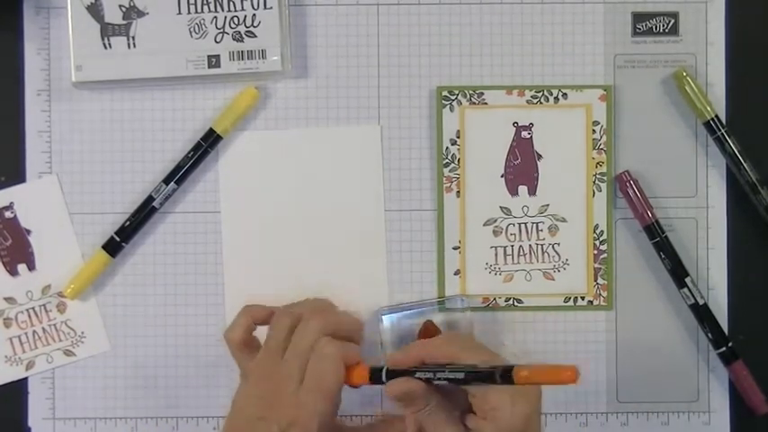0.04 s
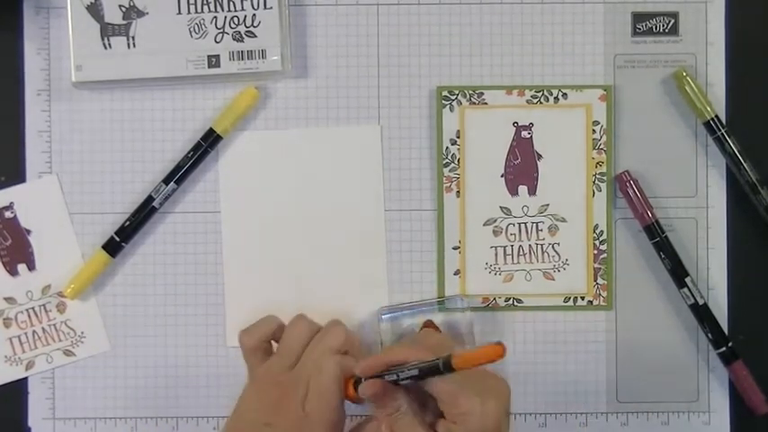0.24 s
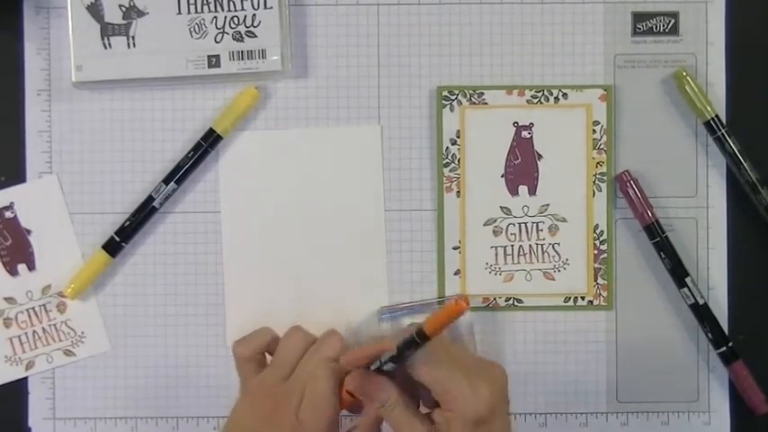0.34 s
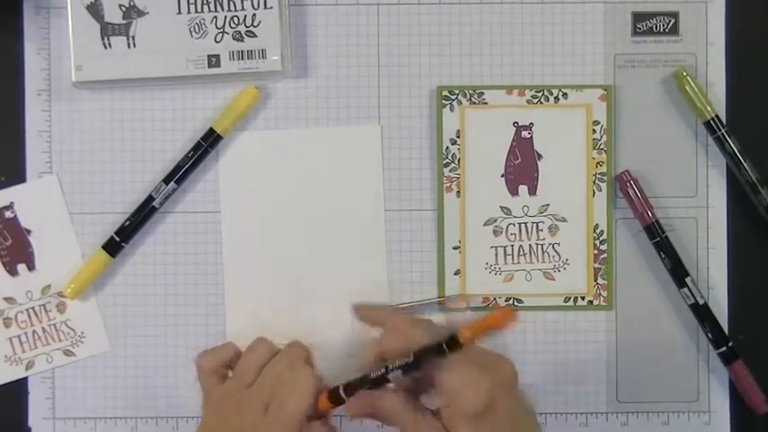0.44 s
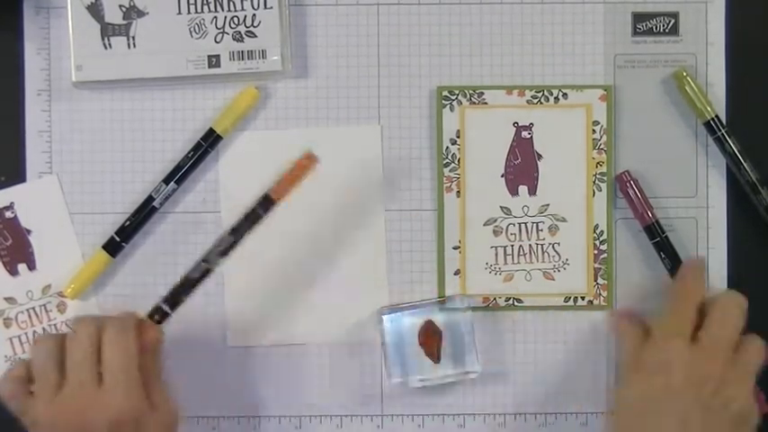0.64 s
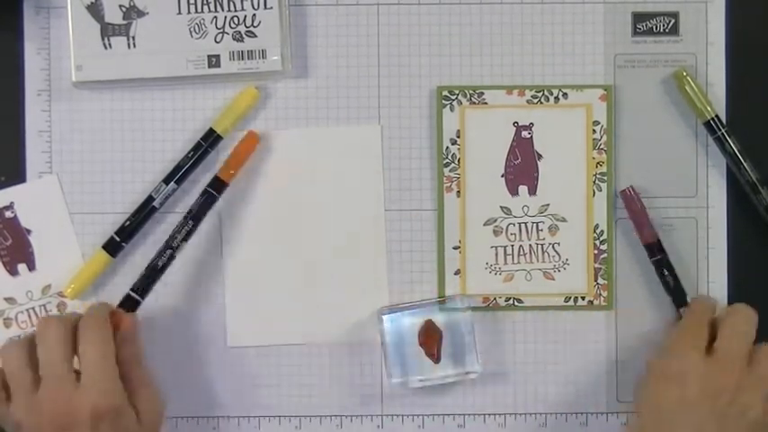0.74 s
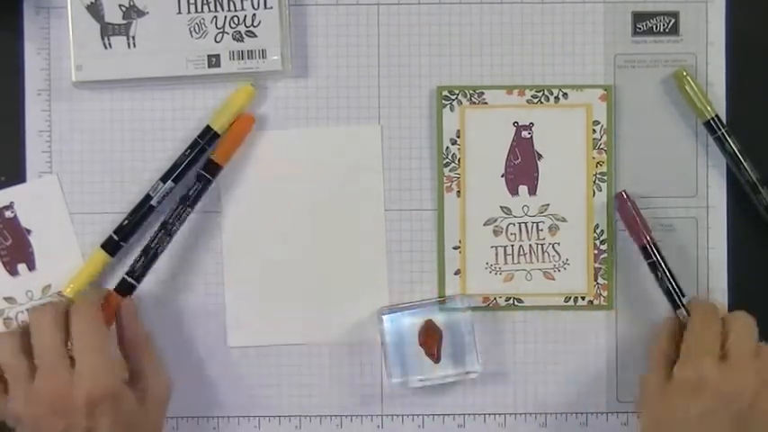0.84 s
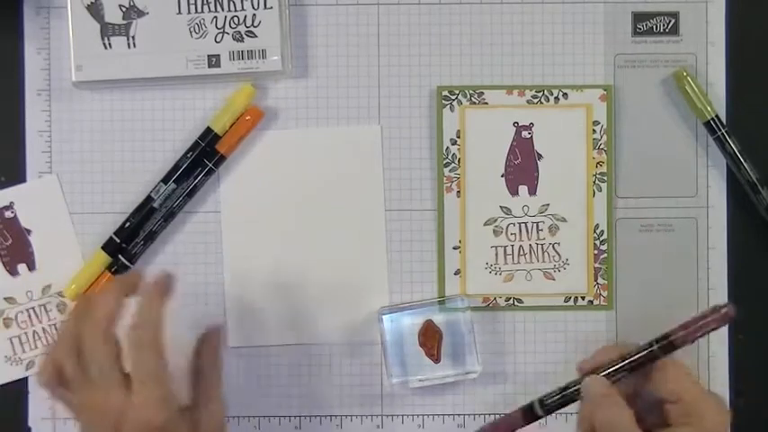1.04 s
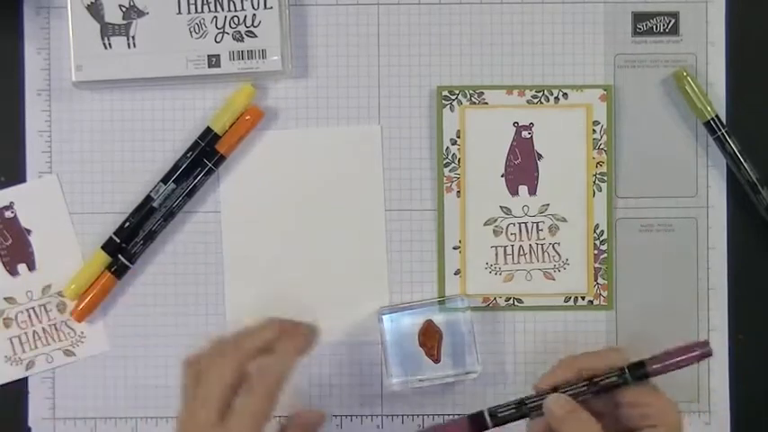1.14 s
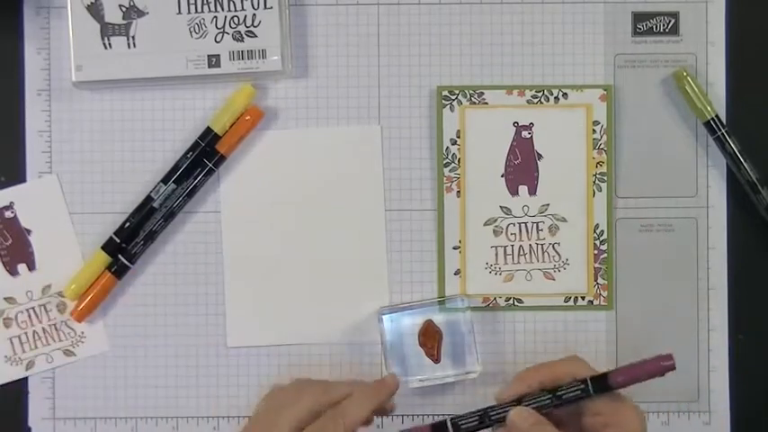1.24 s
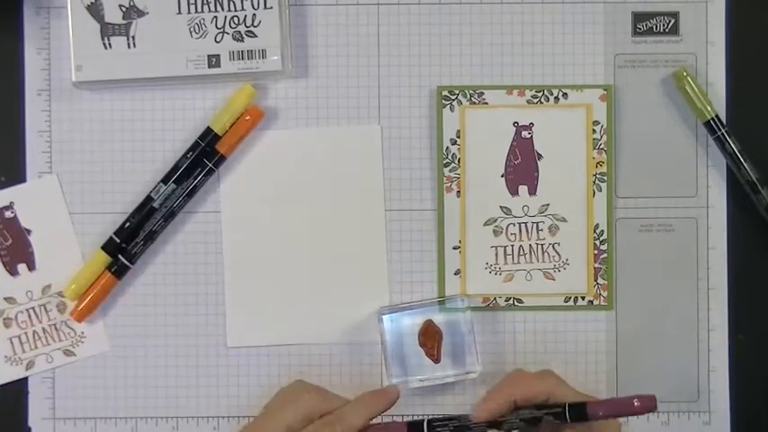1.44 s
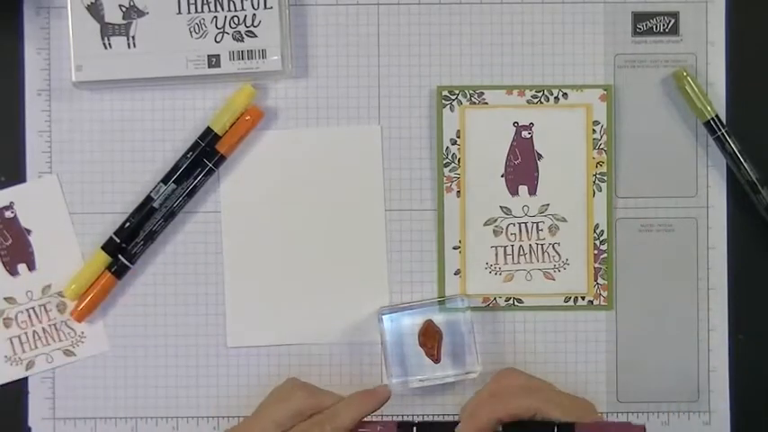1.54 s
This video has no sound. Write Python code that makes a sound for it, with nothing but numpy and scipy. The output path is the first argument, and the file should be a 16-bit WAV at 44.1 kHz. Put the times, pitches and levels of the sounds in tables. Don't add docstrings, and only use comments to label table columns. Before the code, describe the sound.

Plastic felt markers on a wooden table, heard close from above. Tiny cap creaks from 0.03 s lead to a sharp snap at 0.21 s. One hollow pen knocks down at 0.76 s, rocks softly at 0.89 s, and another lands at 0.99 s. Light ticks follow until 1.26 s. Faint motor pulses run until 0.7 s; a distant clock ticks near 0.4 and 1.4 s over soft room hiss.

```python
import sys
import numpy as np
from scipy import signal
from scipy.io import wavfile

SR = 44100
rng = np.random.default_rng(int(sys.argv[2]) if len(sys.argv) > 2 else 0)


def convert_level_to_amplitude(level_db):
    exponent = np.asarray(level_db, float) / 20
    return 10 ** exponent


def store_pcm(level_fs):
    pcm = np.round(np.clip(level_fs, -1, 1) * 32767).astype(np.int16)
    wavfile.write(sys.argv[1], SR, np.atleast_2d(pcm).T)


N = 70560


def butter(x, order, hz, kind="low"):
    return signal.sosfilt(signal.butter(order, hz, kind, fs=SR, output="sos"), x)


def ring(clicks, hz, t60_s):
    r = convert_level_to_amplitude(-60 / (max(t60_s, 1e-3) * SR))
    w = 2 * np.pi * hz / SR
    return signal.lfilter([1, -r * np.cos(w)], [1, -2 * r * np.cos(w), r * r], clicks)


def strike(contacts, modes, scatter_db, order=2):
    length, body_floor_hz = 4410, 352
    out = np.zeros(N + length)
    spread_db = scatter_db * rng.standard_normal((len(contacts), len(modes)))
    for (start_s, peak_db, cutoff_hz), offsets_db in zip(contacts, spread_db):
        touch = butter(np.arange(length) == 0, order, min(cutoff_hz, 19000))
        touch = touch / touch.max()
        start = int(start_s * SR)
        for (hz, mode_db, t60_s), offset_db in zip(modes, offsets_db):
            level = convert_level_to_amplitude(peak_db + mode_db + offset_db)
            out[start:start + length] += level * ring(touch, hz, t60_s)
    return butter(out[:N], 2, body_floor_hz, "high")


def pan(x, db):
    return x * convert_level_to_amplitude(np.array([[db / 2], [-db / 2]]))


# start_s, peak_db, cutoff_hz
CAP_SNAP = [
    (.2123, -27, 11800),
    (.2126, -10, 12300),
    (.2133, -34, 5200),
]
CAP_CREAKS = [
    (.0346, -38.5, 4030),
    (.0387, -37, 5400),
    (.0414, -37, 6000),
    (.0420, -61, 5100),
    (.0568, -33.5, 7000),
    (.0625, -43, 7000),
    (.0800, -35.5, 9100),
    (.1010, -55, 13100),
    (.1019, -38, 13000),
]
# mode_hz, level_db, t60_s
CAP_MODES = [(1150, -27, 0.034), (1535, -17, 0.012), (2570, -7, 0.0067), (3100, -8.5, 0.009),
             (3860, -14.5, 0.0055), (4700, -13, 0.0089), (5500, -9.5, 0.00057), (8340, -1.5, 0.002),
             (9600, -5.5, 0.002), (11100, -12.5, 0.0032)]
LOOSE_CAP_MODES = [(1430, -12.5, 0.0095), (1860, -11.5, 0.0088), (2500, -23, .012), (3027, -20, 0.045),
                   (3140, -22.5, 0.086), (3420, -21.5, 0.068), (5660, -17.5, 0.0056), (7100, -13, 0.0037),
                   (10000, -15.5, 0.0041)]


def cap():
    snap = strike(CAP_SNAP, CAP_MODES, scatter_db=7.5)
    treble = butter(snap, 2, 6000, "high")
    creaks = strike(CAP_CREAKS, LOOSE_CAP_MODES, scatter_db=3.5)
    return pan(snap - treble, 1.1) + pan(treble, 2.5) + creaks


# start_s, peak_db, cutoff_hz
FIRST_DROP = [
    (.7634, -25.5, 4800),
]
ROCK_BACK = [
    (.8893, -38.5, 6300),
]
SECOND_DROP = [
    (.9862, -23, 5500),
    (.9866, -26.5, 5500),
    (0.9955, -37, 2500),
]
# mode_hz, level_db, t60_s
FIRST_PEN_MODES = [(482, -15, 0.045), (736, -15.5, 0.017), (1150, -21.5, 0.037), (1770, -3, 0.0064),
                   (2240, -14.5, 0.011), (3300, -19.5, 0.017), (4400, -17, 0.0087), (5840, -7.5, 0.0043),
                   (7000, -11, 0.0058)]
SECOND_PEN_MODES = [(436, -14, 0.0086), (895, -17.5, 0.02), (1124, -6.5, 0.018), (2000, -12.5, 0.013),
                    (2660, -10, 0.0079), (3460, -9, 0.0075), (4950, -37, 0.0037), (5730, -8, 0.0031),
                    (7500, -22, .003)]


def pens():
    first = strike(FIRST_DROP, FIRST_PEN_MODES, scatter_db=0.5)
    back = strike(ROCK_BACK, FIRST_PEN_MODES, scatter_db=2.5, order=4)
    second = strike(SECOND_DROP, SECOND_PEN_MODES, scatter_db=1.5)
    return first - back + second


# start_s, peak_db, place_0to1, swell_s
TABLE_BLOWS = [
    (0.7645, -21, 0.0, 0.0018),
    (0.215, -49, 0.4, 0.0049),
    (.5100, -58.5, 0, 0.0025),
    (.7220, -49.5, 0, 0.0025),
    (0.741, -59, 0.2, .004),
    (.9100, -47, 0.8, 0.0086),
    (0.9862, -20, 1.0, 0.0008),
]
# mode_hz, t60_s
TABLE_MODES = [(100, 0.031), (130, 0.2), (200, 0.19), (228, 0.18), (262, 0.092), (275, 0.21), (300, 0.095),
               (322, 0.23), (345, 0.1), (415, 0.23), (440, 0.18), (518, 0.13)]
LEFT_END_DB = [-12.5, -27.5, -24, -11.5, -6, -0.5, -27, -20, -15.5, -13.5, -22, -22.5]
RIGHT_END_DB = [-32, -13.5, -15.5, -11.5, -10.5, -2, -18, -3, -13.5, -11, -18.5, -12.5]
FIRST_SWING = [-1, -1, -1, -1, 1, -1, -1, 1, -1, -1, 1, 1]


def table_top():
    u = np.arange(SR // 2) / SR
    out = np.zeros(N + SR)
    for start_s, peak_db, place, swell_s in TABLE_BLOWS:
        start = int(start_s * SR)
        swell = 1 - np.exp(-u / swell_s)
        for (hz, t60_s), left_db, right_db, way in zip(TABLE_MODES, LEFT_END_DB, RIGHT_END_DB, FIRST_SWING):
            mode_db = left_db + place * (right_db - left_db)
            decay = convert_level_to_amplitude(peak_db + mode_db - 60 * u / t60_s)
            out[start:start + len(u)] += way * decay * swell * np.sin(2 * np.pi * hz * u)
    return butter(out[:N], 2, 72, "high")


TICK_TIMES_S = [.1008, .7183, .7625, .8612, .8757, .9030, .9200, .9857, 1.0227, 1.0685, 1.2538, 1.2540,
                1.2552, 1.2568, 1.2590]
# level_db, pitch_hz, width_hz, length_s
TICK_SOUNDS = [(-32.5, 6300, 3900, 0.001), (-45, 6300, 2300, 0.0018), (-35.5, 5100, 7200, 0.00072),
               (-44, 5800, 8000, 0.0014), (-39, 2800, 7000, 0.0015), (-53, 3100, 4300, .011),
               (-57, 2800, 2500, .0041), (-26.5, 6600, 6200, 0.00095), (-39, 6800, 2500, 0.0018),
               (-39, 4600, 2500, 0.0011), (-47.5, 7900, 3800, 0.0012), (-39, 3820, 1600, 0.0024),
               (-43, 3760, 700, 0.0024), (-41, 2260, 450, 0.003), (-45, 2000, 640, 0.00605)]


def ticks():
    u = np.arange(2205) / SR
    out = np.zeros(N + len(u))
    noises = rng.standard_normal((len(TICK_SOUNDS), len(u)))
    for start_s, (level_db, pitch_hz, width_hz, length_s), noise in zip(TICK_TIMES_S, TICK_SOUNDS, noises):
        low_hz = pitch_hz - min(width_hz, pitch_hz) / 2
        high_hz = min(pitch_hz + width_hz / 2, 19000)
        burst = butter(noise * np.exp(-u / length_s), 2, [low_hz, high_hz], "band")
        start = int(start_s * SR)
        out[start:start + len(u)] += convert_level_to_amplitude(level_db) * burst / np.abs(burst).max()
    return out[:N]


# tone_hz, level_db, length_s
MOTOR_TONES = [(893, -55, 0.009), (2838, -59.5, 0.0093)]
MOTOR_LAG_S = [-.0025, .001]
SINGING_STEPS = [4, 10, 11, 13, 15, 16, 18, 20]


def focus_motor():
    steps_per_s, from_s, to_s = 30.0, 0.0135, 0.70
    first_step_db, scatter_db, quiet_step_db = 5.5, 1.4, -14
    times_s = np.arange(from_s, to_s, 1 / steps_per_s)
    offset_db = scatter_db * rng.standard_normal((len(times_s), 2))
    offset_db[0, 0] += first_step_db
    offset_db[:, 1] += quiet_step_db * ~np.isin(np.arange(len(times_s)), SINGING_STEPS)
    t, out = np.arange(N) / SR, 0
    for k, ((hz, tone_db, length_s), lag_s) in enumerate(zip(MOTOR_TONES, MOTOR_LAG_S)):
        for start_s, level_db in zip(times_s, tone_db + offset_db[:, k]):
            u = t - start_s - lag_s
            swell = np.sin(np.pi * np.clip(u / length_s, 0, 1))
            out = out + convert_level_to_amplitude(level_db) * swell * np.sin(2 * np.pi * hz * u)
    return out


CLOCK_FIRST_S, CLOCK_PERIOD_S = 0.382, 1.0
# mode_hz, level_db, t60_s
CLOCK_MODES = [(423, -56, 0.029), (550, -55.5, 0.14), (743, -56.5, 0.015), (1640, -55, 0.0048),
               (3050, -64, 0.0052), (6500, -63.5, 0.004)]
CLOCK_LAG_S = [.012, .012, .012, 0, 0, 0]


def clock():
    attack_s, spread_s = 0.01, 0.042
    out, noise = 0, rng.standard_normal((2, N))
    for k, ((hz, level_db, t60_s), lag_s) in enumerate(zip(CLOCK_MODES, CLOCK_LAG_S)):
        u = (np.arange(N) / SR - CLOCK_FIRST_S - lag_s) % CLOCK_PERIOD_S
        envelope = np.minimum(u / attack_s, 1) * np.exp(-u / spread_s)
        tone = ring(ring(noise[k % 2], hz, t60_s), hz, t60_s / 3)
        tone = tone / np.sqrt(np.mean(tone ** 2) + 1e-20)
        out = out + convert_level_to_amplitude(level_db) * tone * envelope
    return out


def train(rows):
    out = np.full(N, 1e-18)
    for row in rows:
        out[int(row[0] * SR)] += convert_level_to_amplitude(row[1])
    return out


KNOCK_LAG_S = [.0145, .041]


def clock_knock():
    hz, level_db, t60_s, back_db = 543, -45, 0.077, -2
    rows = []
    for n in range(2):
        for k, lag_s in enumerate(KNOCK_LAG_S):
            rows.append((CLOCK_FIRST_S + n * CLOCK_PERIOD_S + lag_s, level_db + k * back_db))
    soft = butter(train(rows), 2, [hz / 2, hz * 2], "band")
    return ring(soft, hz, t60_s)


def at_hz(points, hz):
    table_hz, values = np.transpose(points)
    return np.interp(np.log(hz), np.log(table_hz), values)


def bands(spectrum, likeness, size):
    edges_hz = 20 * 2 ** np.arange(0, 9.9, 1 / 3)
    settle = 4000
    white, out = rng.standard_normal((2, 2, size + settle)), []
    for k, (low_hz, high_hz) in enumerate(zip(edges_hz, edges_hz[1:])):
        mid, side = butter(white[k % 2], 2, [low_hz, high_hz], "band")[:, settle:]
        hz = np.sqrt(low_hz * high_hz)
        alike = np.clip(at_hz(likeness, hz), 0, 1)
        stereo = np.sqrt(1 + alike) * mid + np.sqrt(1 - alike) * side * [[1], [-1]]
        out.append((hz, convert_level_to_amplitude(at_hz(spectrum, hz)) * stereo))
    total = np.sqrt(np.mean(sum(band for _, band in out) ** 2))
    return [(hz, band / total) for hz, band in out]


# hz, t60_s
ROOM_T60 = [(200, 0.38), (1000, 0.28), (3000, 0.28), (8000, 0.23), (15000, 0.28)]
# hz, left_right_likeness
ECHO_LIKENESS = [(200, 0.97), (1500, 0.99), (6000, 1), (15000, 1)]
# lag_s, gain_db over the diffuse answer
WALLS = [(0.0118, 4.5), (0.023, 3), (.029, -1.5), (.038, -0.5), (.0245, -1.5), (.033, 3.5)]


def echo(rows, colour, level_db):
    first_wall_s, build_s, wall_width_s, desk_share = 0.0062, 0.0024, 0.002, 0.68
    t = np.arange(SR // 2) / SR
    build = 1 - np.exp(-np.maximum(t - first_wall_s, 0) / build_s)
    build = build + desk_share * (t > 0.001) * (t < first_wall_s + build_s)
    walls_db = sum(db * np.exp(-((t - lag_s) / wall_width_s) ** 2) for lag_s, db in WALLS)
    diffuse = 0
    for hz, band in bands(colour, ECHO_LIKENESS, size=len(t)):
        diffuse = diffuse + band * convert_level_to_amplitude(-60 * t / at_hz(ROOM_T60, hz))
    answer = build * convert_level_to_amplitude(walls_db) * diffuse
    return convert_level_to_amplitude(level_db) * signal.fftconvolve(train(rows)[None], answer, axes=1)[:, :N]


# hz, density_db
SNAP_COLOUR = [(88, -52), (150, -23), (524, -7), (805, -13), (1450, -2.5), (2140, -2), (3840, -1.5),
               (8900, -10.5), (16000, -23)]
CREAK_COLOUR = [(290, -43), (500, -9), (688, 1), (988, -16), (1060, -3.5), (3110, 3.5), (3700, -5.5),
                (6230, -7), (16000, -32)]
DROP_COLOUR = [(320, -11), (550, -5.5), (699, -14), (772, -2), (1520, -8), (1750, -6.5), (2950, -15),
               (7060, -28), (16000, -44)]
BOUNCE_COLOUR = [(240, -21), (400, -4.5), (1600, -7), (2670, -10), (4800, -12), (16000, -53)]
THUD_COLOUR = [(70, -56), (130, -35), (200, -7), (295, 5), (450, -13), (620, -33)]


def room_echoes():
    echoes = echo(CAP_SNAP[1:2], SNAP_COLOUR, level_db=-19)
    echoes = echoes + echo(CAP_CREAKS, CREAK_COLOUR, level_db=-15)
    echoes = echoes + echo(FIRST_DROP[:1] + SECOND_DROP, DROP_COLOUR, level_db=-10)
    echoes = echoes + echo(ROCK_BACK, BOUNCE_COLOUR, level_db=-7)
    echoes = echoes + echo(FIRST_DROP[:1] + SECOND_DROP[:1], THUD_COLOUR, level_db=-16)
    return butter(echoes, 4, 90, "high")


# hz, density_db
HISS_COLOUR = [(12, -29), (20, -3), (351, -1.5), (535, -6), (863, -6.5), (2310, -13.5), (2890, -14),
               (15000, -25), (16500, -29)]
# hz, left_right_likeness
HISS_LIKENESS = [(60, 0.56), (240, 0.4), (950, 0.12), (3770, 0.99), (15000, 1.0)]


def room_hiss():
    return convert_level_to_amplitude(-57) * sum(band for _, band in bands(HISS_COLOUR, HISS_LIKENESS, size=N))


def scene():
    contacts = cap() + pan(pens() + table_top(), 1.5)
    air_top_hz = 15900
    air = room_echoes() + room_hiss()
    air = signal.sosfilt(signal.cheby2(10, 40, air_top_hz + 300, fs=SR, output="sos"), air)
    return contacts + ticks() + clock() + clock_knock() + focus_motor() + air


def band_limit(x):
    return signal.sosfilt(signal.butter(12, 17070, fs=SR, output="sos"), x)


def record(dry):
    mic_top_hz, mic_top_db, cutoff_hz = 11300, -7.5, 17300
    low = butter(dry, 1, mic_top_hz)
    mic = low + convert_level_to_amplitude(mic_top_db) * (dry - low)
    mix = signal.sosfilt(signal.cheby2(10, 60, cutoff_hz, fs=SR, output="sos"), mic)
    return band_limit(mix)


dry = scene()
out = record(dry)
store_pcm(out)
```